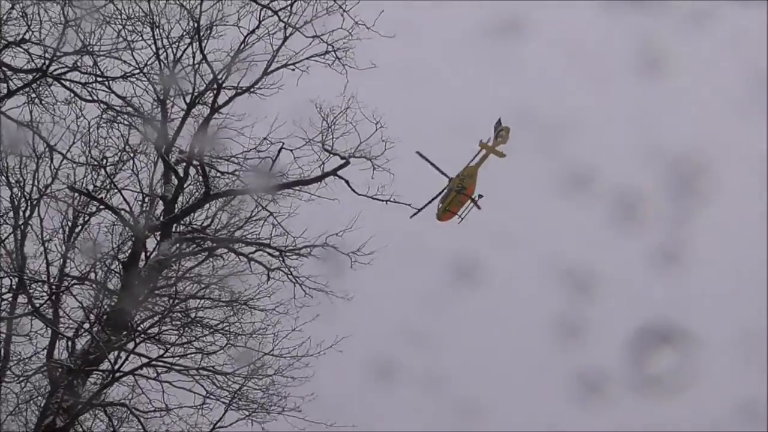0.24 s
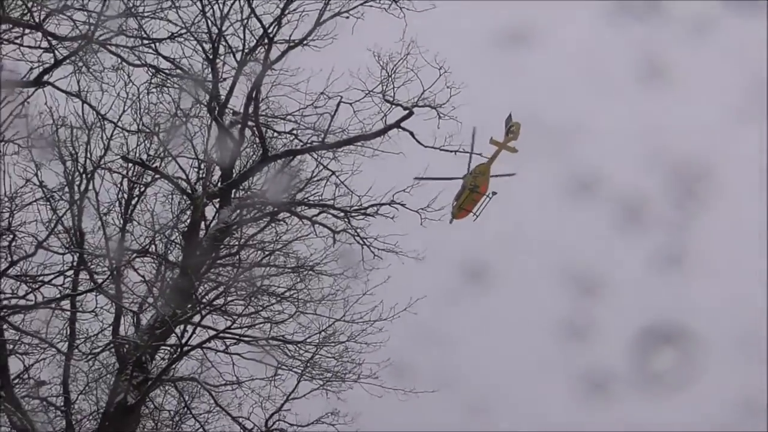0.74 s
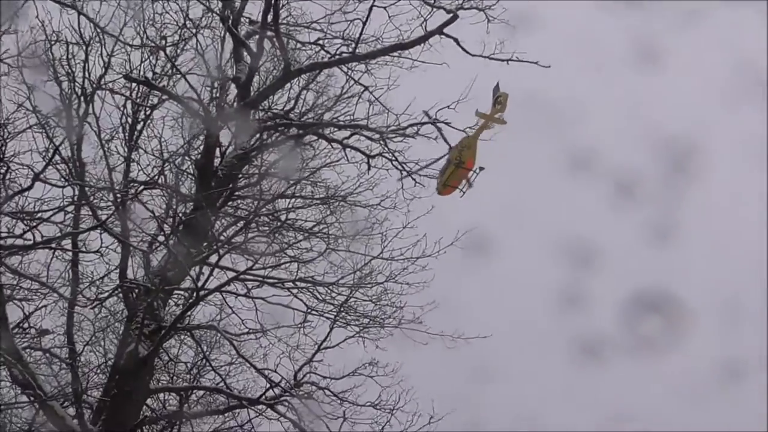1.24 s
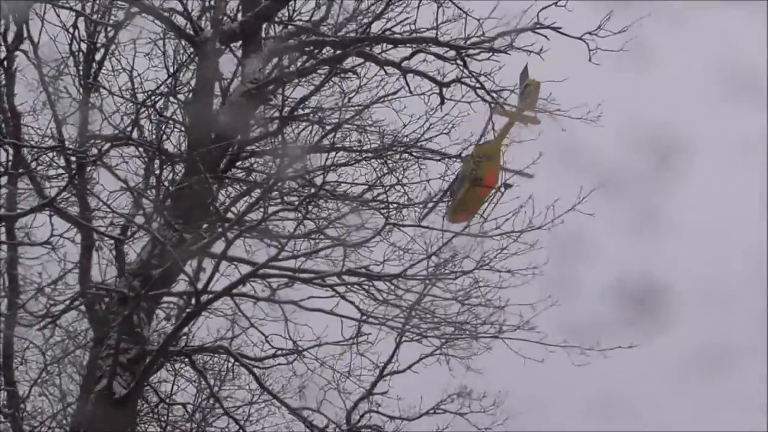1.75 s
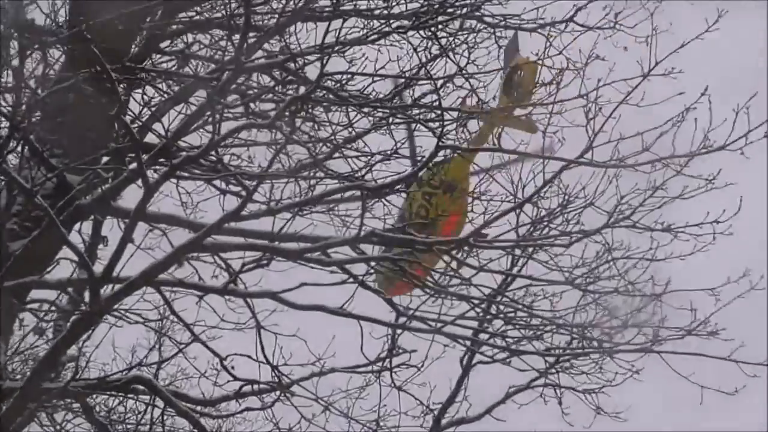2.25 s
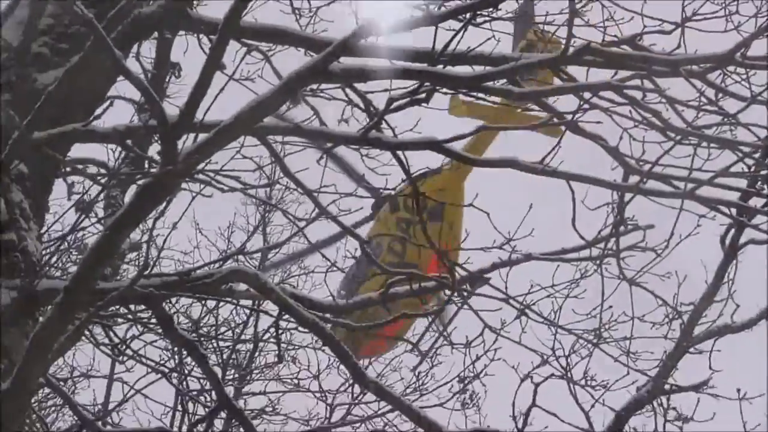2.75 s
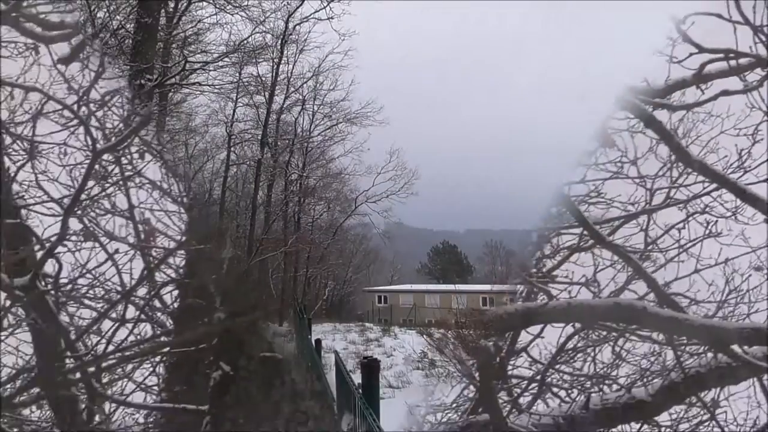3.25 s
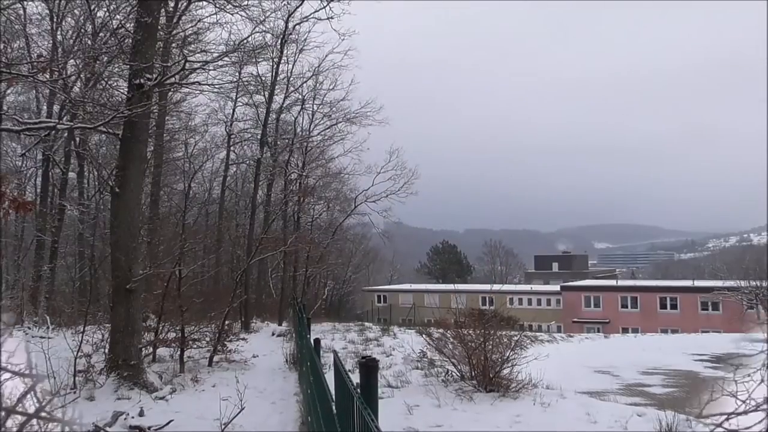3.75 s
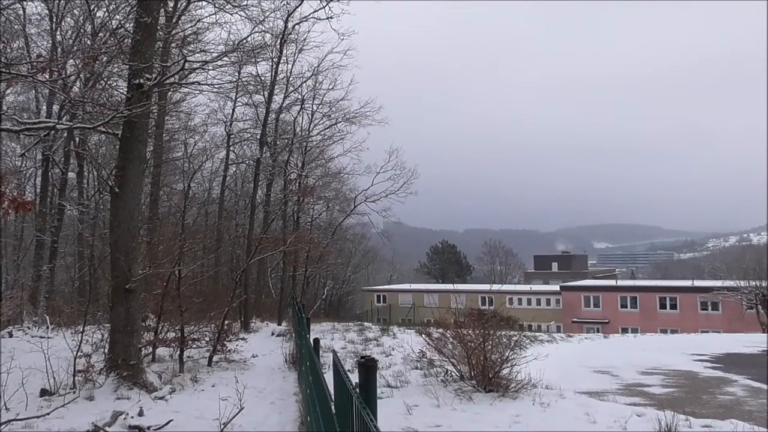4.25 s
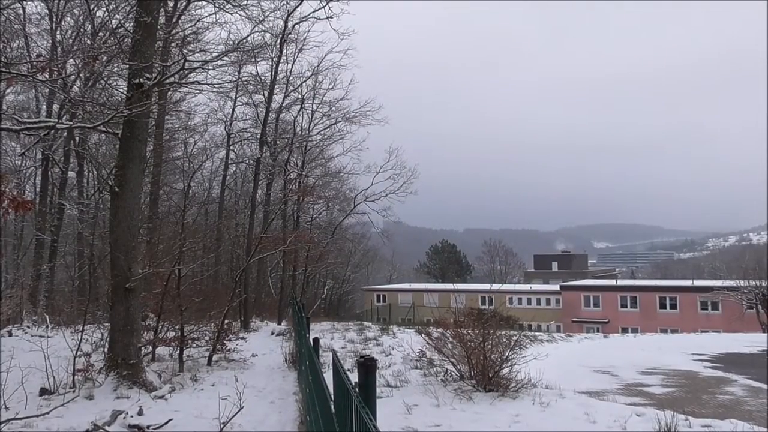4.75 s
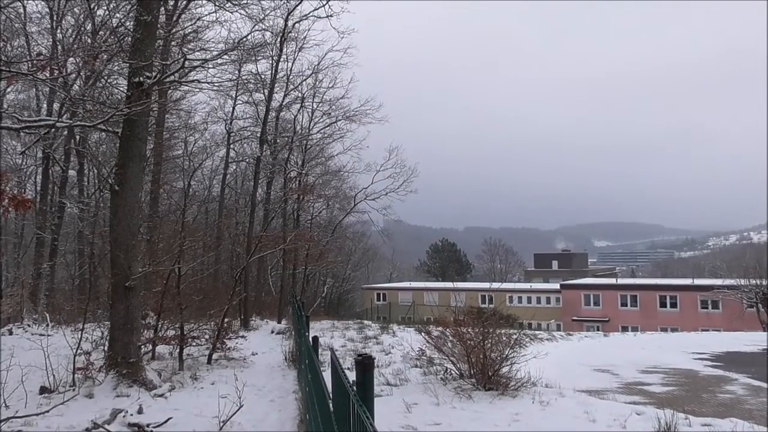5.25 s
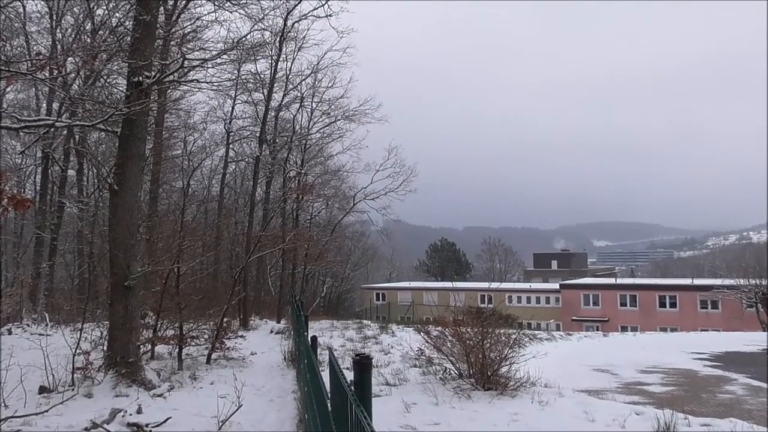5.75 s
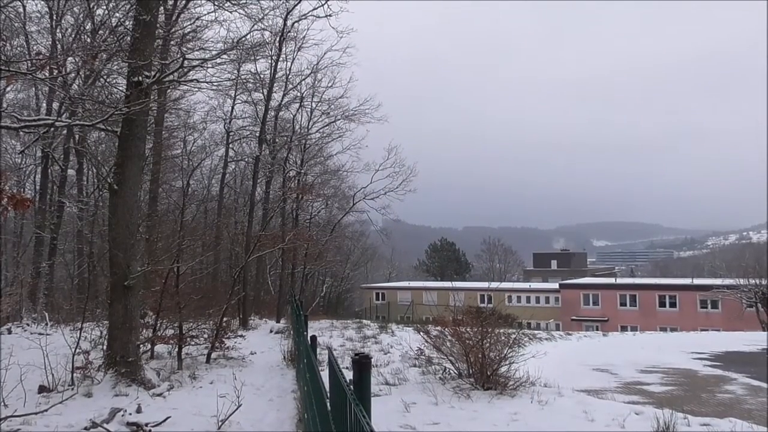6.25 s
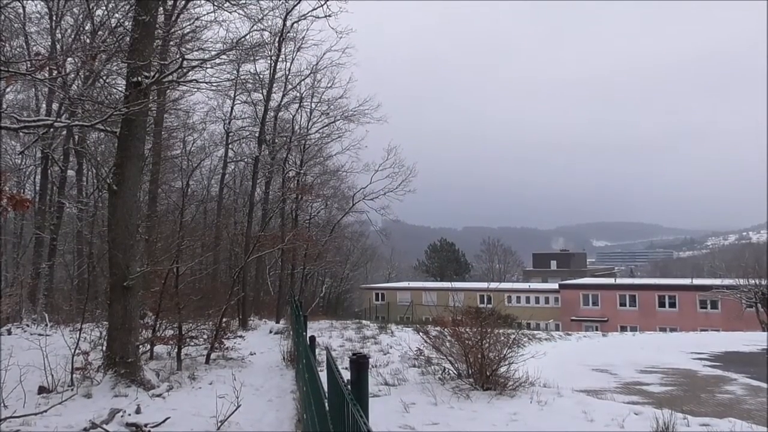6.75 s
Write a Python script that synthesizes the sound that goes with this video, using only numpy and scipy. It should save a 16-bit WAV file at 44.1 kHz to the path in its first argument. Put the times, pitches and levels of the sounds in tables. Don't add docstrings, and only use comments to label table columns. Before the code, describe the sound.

Outdoors in winter, a helicopter passes over bare trees: a dense, fast-fluttering roar with jet hiss, high turbine whistle and humming tail fan. It swells to its loudest around two and a half seconds, with sharp blade slaps and low wind thumps on the microphone, then sinks. At four seconds it cuts instantly to a quiet snowy field, where a distant rotor murmurs and a nearby sleeve ticks faintly.

```python
import sys
import numpy as np
from scipy import signal
from scipy.fft import rfft, irfft, next_fast_len
from scipy.io import wavfile
from scipy.ndimage import uniform_filter1d, map_coordinates

SR = 44100
rng = np.random.default_rng(int(sys.argv[2]) if len(sys.argv) > 2 else 0)


def file_out(sig):
    cols = np.atleast_2d(sig).T
    lim = np.clip(cols, -1, 1)
    pcm = np.round(lim * 32767).astype(np.int16)
    wavfile.write(sys.argv[1], SR, pcm)


def ratio(d):
    e = np.asarray(d, float) / 20
    return 10 ** e


N = 309141
T = np.arange(N) / SR


def unit(x):
    return x / np.sqrt(np.mean(x ** 2) + 1e-20)


def along(points, hz):
    f, v = np.transpose(points)
    return np.interp(np.log(hz + 1), np.log(f + 1), v)


def curves(rows):
    s, *columns = np.transpose(rows)
    return [np.interp(T, s, column) for column in columns]


def bell(s, width):
    return np.exp(-((T - s) / width) ** 2 / 2)


def swells(rows):
    return sum(db * bell(s, width) for s, db, width in rows)


def wobble(rate):
    knots = rng.standard_normal(int(N * rate / SR) + 4)
    return map_coordinates(knots, [np.arange(N) * rate / SR])


def filtered(x, response):
    m = next_fast_len(N + 8192)
    return irfft(rfft(x, m) * response(np.fft.rfftfreq(m, 1 / SR)), m)[..., :N]


def rush(spectrum, patchy_db, channels=1):
    z = signal.stft(rng.standard_normal((channels, N)), nperseg=512)[2]
    field = uniform_filter1d(rng.standard_normal(z.shape[1:]), size=5, axis=0)
    field = uniform_filter1d(field, size=10, axis=1)
    noise = signal.istft(z * ratio(patchy_db * unit(field)), nperseg=512)[1][:, :N]
    return unit(filtered(noise, lambda hz: ratio(along(spectrum, hz))))


def fuzzy(hz, blur_hz, rough):
    rough = np.clip(rough, 0, 1)
    noise = wobble(blur_hz) + 1j * wobble(blur_hz)
    scatter = np.sqrt(1 - rough) + np.sqrt(rough / 2) * noise
    turning = np.exp(2j * np.pi * (np.cumsum(hz) / SR + rng.random()))
    return np.sqrt(2) * np.real(scatter * turning)


# f/Hz, level/dB per Hz
ROAR_COLOUR = [(30, -48), (70, -32.5), (120, -20.5), (200, -5.5), (270, -0.5), (400, -1), (550, -0.5),
               (850, 0.5), (1200, -3.5), (1500, -7.5), (1900, -29), (2600, -27.5), (3400, -44),
               (5700, -120)]


def rotor_roar(roar_db, beat, air):
    pulse_db = beat / 3 + 0.42 * air
    return ratio(roar_db - 1.5 + pulse_db) * rush(ROAR_COLOUR, patchy_db=0.5, channels=2)


# sevenths of the main tone, level/dB, extra level/dB while the tail points away
FAN_LINES = [(1, -13, 0.5), (2, -4.5, 2), (3, -8.5, 2), (4, -4.5, -9), (5, -4, 2), (6, -6.5, 2),
             (8, -12, 1.5)]
# t/s, level/dB, half width/s
DRONE_SWELLS = [
    (.25, -2.5, .2),
    (1.05, 3, 0.3),
    (1.5, 2.5, .15),
    (2.3, 0.5, .2),
    (2.95, 1.5, .15),
    (3.5, 2.5, .2),
]


def fan_drone(near_db, fan_hz):
    away = np.exp(-(T / .6) ** 4)
    lines = 0
    for k, db, away_db in FAN_LINES:
        lines = lines + ratio(db + away_db * away) * fuzzy(k * fan_hz / 7, blur_hz=22, rough=.75)
    return ratio(-32 + .2 * near_db + swells(DRONE_SWELLS)) * lines


# t/s, level/dB, half width/s
GAPS = [
    (.3, 4, .2),
    (.95, 8, 0.2),
    (1.52, 9, .11),
    (1.82, 11, 0.13),
    (2.08, 10, .1),
    (2.48, 7, .12),
    (2.87, 10, 0.13),
    (3.28, 5, .08),
    (3.8, 3.5, 0.22),
]


def fan_tone(near_db, fan_hz):
    tone_db = -34 + 0.2 * near_db + 3 * T - 6.5 + swells(GAPS)
    return ratio(tone_db) * fuzzy(fan_hz, blur_hz=12, rough=.1)


# f/Hz, level/dB per Hz
JET_COLOUR = [(1000, -23), (1700, -1.5), (2050, -1), (2500, -6.5), (2900, -4.5), (3150, -6), (3450, -3),
              (3800, -6.5), (4500, -7), (5200, -12.5), (6500, -16), (8450, -34.5), (14300, -120)]


def exhaust_jets(near_db, surge_db, beat, air):
    jet_db = -25 + 1.29 * near_db + (0.5 + 0.23 * T) * surge_db
    flutter_db = 0.7 * beat + 0.5 * air + .25 * wobble(7)
    return ratio(jet_db + flutter_db) * rush(JET_COLOUR, patchy_db=0.85, channels=2)


# f/Hz, level/dB per Hz
SWISH_COLOUR = [(3240, -29), (5500, -7), (6400, 0.5), (7800, 2), (9450, -5.5), (11000, -10.5), (12500, -16),
                (14000, -45.5)]
# f/Hz, level/dB per Hz
SIZZLE_COLOUR = [(8500, -32), (10500, -2.5), (12000, -3), (13200, -8), (14000, -12.5), (14700, -18),
                 (15400, -22.5)]


def blade_swish(near_db, surge_db, beat, air):
    swish_db = -28.5 + 1.23 * near_db - 2 * T + surge_db
    sizzle_db = swish_db - 5.5 - 3.3 * np.minimum(T, 2.9)
    swish = ratio(swish_db + 0.9 * beat + 0.5 * air) * rush(SWISH_COLOUR, patchy_db=0.9, channels=2)
    sizzle = ratio(sizzle_db + 1.4 * beat) * rush(SIZZLE_COLOUR, patchy_db=2.0, channels=2)
    return swish + sizzle


def compressor_whistle(near_db, flare_db, whistle_hz):
    whistle_db = -40 + near_db - 2 * T + flare_db + 1.5 * wobble(20)
    return ratio(whistle_db) * fuzzy(whistle_hz, blur_hz=200, rough=.7)


def blade_glint(flare_db, whistle_hz, turn):
    sweep = (turn - .5) / .11
    glint_hz = whistle_hz * (1.085 - 0.03 * sweep.clip(-3, 3))
    flash = np.exp(-sweep ** 2 / 2) * ratio(2.4 * wobble(22))
    glint_db = np.maximum(-50 - 3.2 * T + .3 * flare_db, -63) - 3.5
    return ratio(glint_db) * unit(flash * fuzzy(glint_hz, blur_hz=300, rough=0.67))


# t/s, delay/ms
SNOW_DELAY = [(0, 8.35), (.7, 8.0), (1.5, 7.5), (2.0, 7.0), (3.0, 6.2), (4.08, 5.1)]


def off_snow(sound):
    late = map_coordinates(sound, [np.abs(T - curves(SNOW_DELAY)[0] / 1000) * SR], order=1)
    return ratio(-3) * filtered(late, lambda hz: 1 / (1 + (hz / 800) ** 2))


# t/s, level/dB, treble level/dB, whistle level/dB
OFF_AXIS = [(0, -11, -1, 0), (.3, 2.5, 5, 0), (.6, 2.5, 4, 0), (1.1, 3.5, 7, -4), (1.6, 6, 5, 0),
            (2, 7, -1.5, 1), (2.6, 5.5, -3, 4), (3.3, 5.5, -3, 4.5), (3.6, 8, -5, 0), (4.08, 11.5, -2, 0)]
# f/Hz, level/dB
PORT_DIFFERENCE = [(100, -66.5), (700, -50.5), (2000, -27), (4500, -20.5), (6200, -23), (8500, -19),
                   (11000, -24.5), (15000, -33)]


def at_the_ports(mid, stray, whistle):
    off_db, treble_db, piped_db = curves(OFF_AXIS)
    treble = filtered(stray, lambda hz: 1 / (1 + (9000 / (hz + 1)) ** 8))
    stray = stray + (ratio(treble_db) - 1) * treble + ratio(piped_db) * whistle
    side = ratio(off_db) * filtered(stray, lambda hz: ratio(along(PORT_DIFFERENCE, hz)))
    both = np.array([mid + side, mid - side])
    return filtered(both, lambda hz: 1 / (1 + (hz / 15300) ** 60))


# t/s, roar level/dB
NEAR = [(0, -23.5), (.15, -22), (.3, -21.5), (.7, -21), (.85, -20.5), (1.4, -18.5), (1.9, -16.5),
        (2.4, -13.5), (2.68, -13.5), (2.98, -14.5), (3.1, -16), (3.55, -17.5), (3.8, -19), (4.08, -22)]
# t/s, whistle f/Hz, tail fan f/Hz
PITCH = [(0, 12470, 842), (.6, 12425, 840), (1.5, 12335, 843), (2.1, 12265, 845), (2.7, 12160, 830),
         (3.2, 12050, 814), (3.7, 12005, 802), (4.08, 11920, 797)]
# t/s, level/dB, half width/s
SURGES = [(.1, 8.5, 0.0053), (.2, 4, 0.032), (.66, 6.5, 0.019), (.8, 2, 0.015), (.98, 1, 0.031),
          (1.91, 2.5, 0.02), (2.13, 1.5, 0.0096), (2.55, 1.5, 0.021), (2.68, 3, 0.068), (2.87, 2.5, 0.018),
          (2.97, 2.5, 0.085), (3.05, -4.5, 0.0074), (3.3, 2.5, 0.21), (3.57, 1, 0.032)]
# t/s, level/dB, half width/s
FLARES = [(.19, 13, .025), (.475, 11, .025), (.54, 6, .025), (.615, 18.5, 0.037), (.78, 5, .03),
          (1.2, 5, .02), (1.515, 7, 0.027), (1.62, 5, .025), (1.82, 8.5, .02), (1.94, 1.5, .04),
          (2.085, 12, .025), (2.32, 8, 0.04), (2.385, 9.5, .015), (2.43, 5, .02), (2.68, 12, 0.046),
          (2.78, 3.5, 0.033), (2.885, 11, .035), (3.04, 6, .025), (3.125, 13, .02), (3.67, 6, .015),
          (3.745, 14, 0.027)]


def helicopter():
    nearest_db = -13
    near_db = curves(NEAR)[0] - nearest_db
    surge_db, flare_db = swells(SURGES), swells(FLARES)
    whistle_hz, fan_hz = curves(PITCH)
    turn = (26.8 * T - .118 * T ** 2) % 1
    beat = -np.cos(2 * np.pi * turn)
    air = wobble(14)
    noise = rotor_roar(nearest_db + near_db + 0.27 * surge_db, beat, air)
    noise[0] += fan_drone(near_db, fan_hz) + slaps()
    noise[0] += off_snow(noise[0])
    noise[0] += fan_tone(near_db, fan_hz)
    noise += exhaust_jets(near_db, surge_db, beat, air)
    noise += blade_swish(near_db, surge_db, beat, air)
    whistle = compressor_whistle(near_db, flare_db, whistle_hz)
    mid = noise[0] + whistle + blade_glint(flare_db, whistle_hz, turn)
    return at_the_ports(mid, noise[1], whistle)


# start t/s, level/dB, length/s
GUSTS = [(0.196, -22.5, 0.08), (0.287, -20, 0.1), (0.417, -24.5, 0.11), (0.553, -27, 0.12),
         (.7, -30.5, .16), (1.02, -42, 0.14), (1.206, -38, 0.047), (1.393, -34, 0.13), (1.6, -36, 0.092),
         (1.733, -31.5, 0.15), (2.145, -45, 0.11), (2.9, -26, 0.06), (3.0, -29.5, .08),
         (3.111, -16.5, 0.089), (3.22, -28, 0.13), (3.436, -25, 0.14), (3.658, -30.5, 0.079),
         (3.75, -25.5, 0.089), (3.874, -22.5, 0.15), (4.03, -28, 0.13)]
# f/Hz, level/dB per Hz
BUFFET_COLOUR = [(15, -59), (25, -35.5), (88, -3.5), (186, 0.5), (280, -1.5), (433, -9), (469, -19),
                 (628, -14), (800, -16), (1200, -31.5), (1560, -56.5), (2640, -120)]


def wind():
    gusts = 0
    for s, db, length in GUSTS:
        rise = (1 + np.tanh((T - s) / 0.015)) / 2
        fall = (1 + np.tanh((s + length - T) / 0.051)) / 2
        gusts = gusts + ratio(db) * rise * fall
    breeze = ratio(-27.5 - 11.5 * T)
    shared, apart = unit(ratio(0.9 * wobble(27)) * rush(BUFFET_COLOUR, patchy_db=0.5, channels=2))
    shared = shared * (gusts * ratio(0.81 * wobble(17)) + breeze)
    apart = apart * gusts * ratio(-21.5 + 3.5 * T + 2.5 * wobble(20))
    return np.array([shared + apart, shared - apart])


# t/s, peak level/dB
SLAPS = [(0.831, -9), (0.907, -14), (1.072, -8), (1.373, -7.5), (1.419, -14), (1.632, -5), (1.761, -5.5),
         (1.808, -6), (2.02, -8), (2.131, -7.5), (2.195, -8), (2.303, -3), (2.465, 0.5), (2.619, -6),
         (2.678, 5.5), (2.715, -3.5), (3.112, -2), (3.346, -7), (3.406, 0), (3.443, -7), (3.545, -4.5),
         (3.598, -7), (3.845, -8.5), (3.951, -21), (4.075, -19)]
# f/Hz, level/dB per Hz
SLAP_COLOUR = [(150, -43), (350, -4.5), (800, 1.5), (1400, -4), (2500, -19), (5000, -24.5), (9000, -49)]


def slaps():
    shape = 0
    for s, db in SLAPS:
        rise, fall = (s + 0.0022 - T) / 0.0013, (T - s - .002) / .006
        shape = shape + ratio(db - 12) * np.exp(-np.where(T < s + .002, rise, fall))
    return shape * rush(SLAP_COLOUR, patchy_db=1)[0]


# multiple of the blade rate, level/dB
THUD_LINES = [(1, -30), (2, -5.5), (3, 0.5), (4, 1), (5, -2.5), (6, -16), (7, -10.5), (9, -19)]


def far_thuds(turn, drift_db):
    thud = sum(ratio(db + 2 * wobble(7)) * np.cos(k * turn - .25) for k, db in THUD_LINES)
    return ratio(-50.5 + 0.23 * drift_db) * unit(thud)


# t/s, level/dB, half width/s
TAIL_CARRIES = [
    (4.3, 6, .08),
    (4.55, 3, .08),
    (4.85, 7, .08),
    (5.15, 6, 0.12),
    (5.48, 9.5, .11),
    (5.9, 6, 0.09),
    (6.12, 4, .06),
    (6.38, 5, .09),
    (6.68, 6, 0.04),
]


def far_tail():
    low_tone = fuzzy(np.full(N, 549.5), blur_hz=14, rough=.45)
    high_tone = fuzzy(np.full(N, 687.4), blur_hz=6, rough=.3)
    return ratio(-60 + swells(TAIL_CARRIES) - 1) * (low_tone + ratio(-6.5) * high_tone)


# f/Hz, level/dB per Hz
RUMBLE_COLOUR = [(18, -45), (30, -19), (67, -19.5), (119, -1), (244, -5), (322, 0), (544, -3), (620, -5),
                 (860, -9), (1500, -27), (1950, -53), (3300, -120)]
# f/Hz, level/dB per Hz
EDGE_COLOUR = [(470, -44), (800, -17), (864, -3), (1110, -3), (1590, -13.5), (3000, -33), (3900, -74),
               (6600, -120)]
# f/Hz, likeness/0-1
ALIKE = [(60, 0.05), (180, 1), (540, 0.73), (1610, 0.5), (4820, 0.06), (14400, -0.04)]


def far_rumble(turn, drift_db):
    rumble_db = -48.5 + 0.38 * drift_db + 0.73 * np.cos(turn)
    rumble = ratio(rumble_db) * rush(RUMBLE_COLOUR, patchy_db=-0.5, channels=2)
    rumble += ratio(-62 + drift_db) * rush(EDGE_COLOUR, patchy_db=-0.5, channels=2)
    angle = lambda hz: np.arccos(np.clip(along(ALIKE, hz), 0, 1)) / 2
    mid, side = filtered(rumble, lambda hz: np.array([np.cos(angle(hz)), np.sin(angle(hz))]))
    return np.array([mid + side, mid - side])


# f/Hz, level/dB per Hz
HISS_COLOUR = [(1500, -27.5), (2600, -10), (4000, -6.5), (6000, -13), (6800, -7), (7400, -6), (9500, -3.5),
               (12000, -4.5), (14000, -9), (15700, -4.5)]


def microphone_hiss():
    return ratio(-71.0) * rush(HISS_COLOUR, patchy_db=.3, channels=2)


# t/s, centre f/Hz, level/dB, half width/s
WALLS = [(4.2, 348.5, -55, .1), (4.29, 1205, -60, .07), (4.5, 340, -54, .08), (4.5, 894, -62, 0.065),
         (5.25, 1240, -66.5, .1), (5.3, 1540, -71, .08), (5.42, 877, -57, 0.092), (5.58, 2120, -80, .09),
         (5.65, 1660, -73, 0.091), (5.75, 1250, -68, .1), (5.9, 1650, -75, .06), (6.15, 340, -57.5, 0.11),
         (6.2, 690, -61.5, 0.13), (6.35, 1233, -72.5, .08), (6.45, 361, -53, 0.15),
         (6.55, 1550, -71.5, .12), (6.8, 360, -58, .1), (6.82, 2180, -82, 0.09)]


def walls():
    hum = 0
    for s, hz, db, width in WALLS:
        hum = hum + ratio(db) * bell(s, width) * fuzzy(np.full(N, hz), blur_hz=.11 * hz, rough=0.99)
    return hum


# t/s, level/dB, half width/s
DRIFTS = [
    (4.27, 2, 0.091),
    (4.65, -1, .2),
    (5.5, 3.5, 0.25),
    (6.15, -1, .15),
]


def far_field():
    drift_db = swells(DRIFTS)
    turn = 2 * np.pi * (30.35 * T - .16 - .045 * (T - 5.45) ** 2)
    hums = far_thuds(turn, drift_db) + far_tail() + walls()
    return hums + far_rumble(turn, drift_db) + microphone_hiss()


# f/Hz, level/dB
CREAK_LINES = [(3900, 0), (5400, -1), (9200, -4)]


def strap_creak():
    creak = sum(ratio(db) * fuzzy(np.full(N, hz), blur_hz=500, rough=.95) for hz, db in CREAK_LINES)
    return ratio(-84) * np.exp(-((T - 4.355) / .032) ** 4) * creak


# t/s, peak level/dB, centre f/Hz
TICKS = [(4.6396, -63, 8810), (5.1394, -62, 7060), (5.2094, -61, 6930), (6.2530, -63, 8500),
         (6.2586, -61, 4500), (6.2640, -61, 7460), (6.2806, -63, 7500), (6.3518, -64, 6500),
         (6.4226, -53, 8200), (6.4350, -65, 6000), (6.6470, -63, 4000), (6.6902, -55, 4420),
         (6.7160, -64, 6000), (6.8524, -57, 9800), (6.8896, -64, 9500)]


def sleeve_ticks():
    out, t = np.zeros((2, N + SR)), np.arange(200) / SR
    port_db = np.array([[1], [3]])
    for s, db, hz in TICKS:
        ring = np.sin(2 * np.pi * hz * t) + 1.5 * rng.standard_normal((2, 200))
        snap = ratio(-60 * t / .0018) * ring
        out[:, round(s * SR):][:, :len(t)] += ratio(db + port_db) * snap
    return filtered(out[:, :N], lambda hz: 1 / (1 + (2600 / (hz + 1)) ** 4) / (1 + (hz / 13000) ** 8))


# t/s, level/dB, half width/s
RUSTLES = [
    (6.27, -79, .02),
    (6.32, -79, .04),
    (6.605, -79, .012),
    (6.655, -73.5, 0.035),
]
# f/Hz, level/dB per Hz
CLOTH_COLOUR = [(2500, -23.5), (4000, -3), (6000, -6), (8000, 1), (11000, -4), (14000, -22)]


def sleeve_rustles():
    strokes = sum(ratio(db) * bell(s, length) for s, db, length in RUSTLES)
    return strokes * ratio(1.2 * wobble(150)) * rush(CLOTH_COLOUR, patchy_db=1.2, channels=2)


def sleeve():
    return strap_creak() + sleeve_ticks() + sleeve_rustles()


def scene():
    near = np.clip((4.0885 - T) / .001, 0, 1)
    return near * (helicopter() + wind()) + (1 - near) * (far_field() + sleeve())


def thin_treble(x, margin_db):
    z = signal.stft(x, nperseg=2048)[2][:, :1024]
    power = np.abs(z[0] + z[1]) ** 2
    total = power.sum(axis=0)
    bands = power.reshape(64, 16, -1).sum(axis=1)
    moment_db = 2.2 * rng.standard_normal(power.shape[1])
    limit = total * ratio(margin_db + moment_db + 1.5 * rng.standard_normal(bands.shape)) ** 2
    keep = (bands > limit) | (np.arange(64)[:, None] < 38) | (total < ratio(-60))
    z = np.pad(z * np.repeat(keep, 16, axis=0), ((0, 0), (0, 1), (0, 0)))
    return signal.istft(z, nperseg=2048)[1][:, :N]


def low_pass(x):
    return signal.sosfilt(signal.butter(12, 15720, fs=SR, output="sos"), x)


def record(dry):
    held = dry / (1 + np.abs(dry / .95) ** 6) ** (1 / 6)
    mix = thin_treble(held, margin_db=-54.5)
    return low_pass(mix)


dry = scene()
out = record(dry)
file_out(out)
```